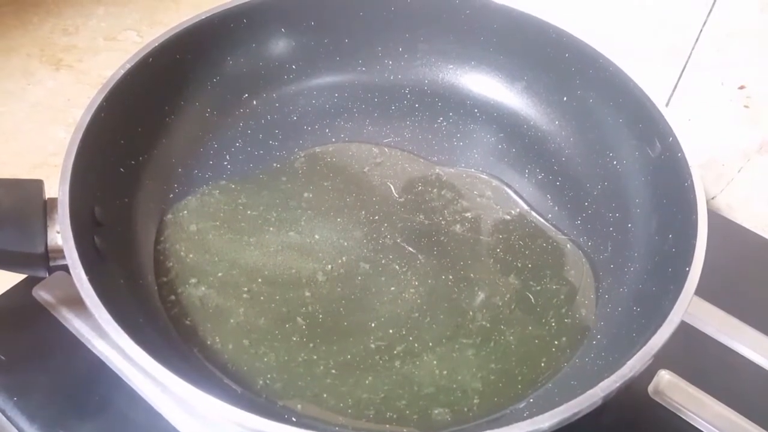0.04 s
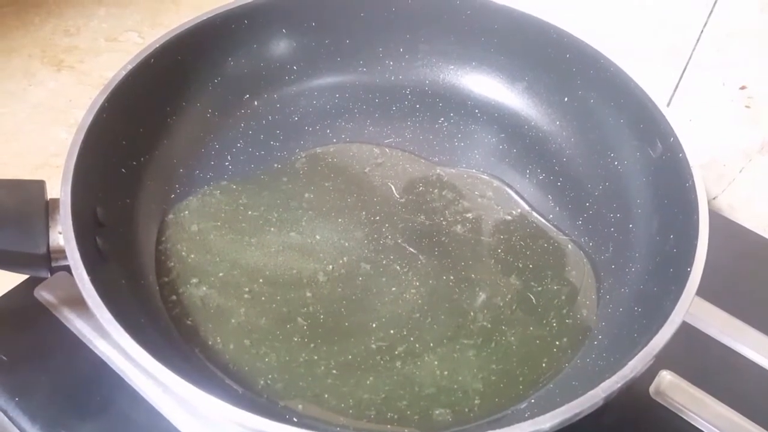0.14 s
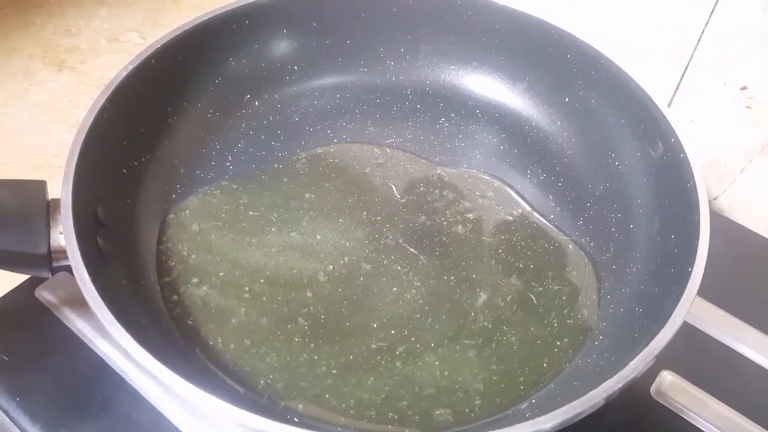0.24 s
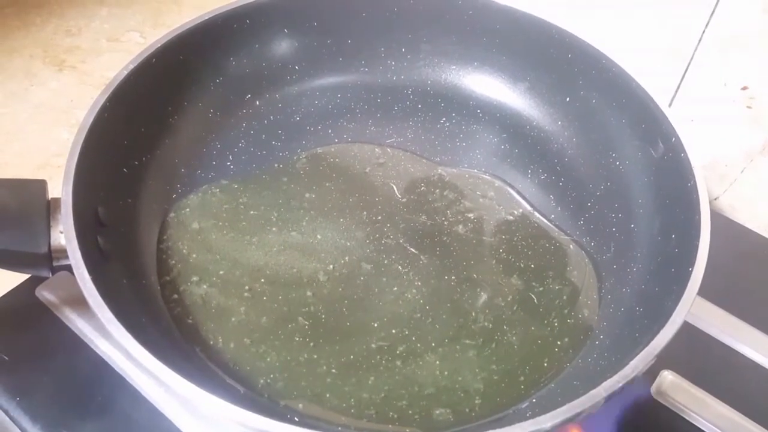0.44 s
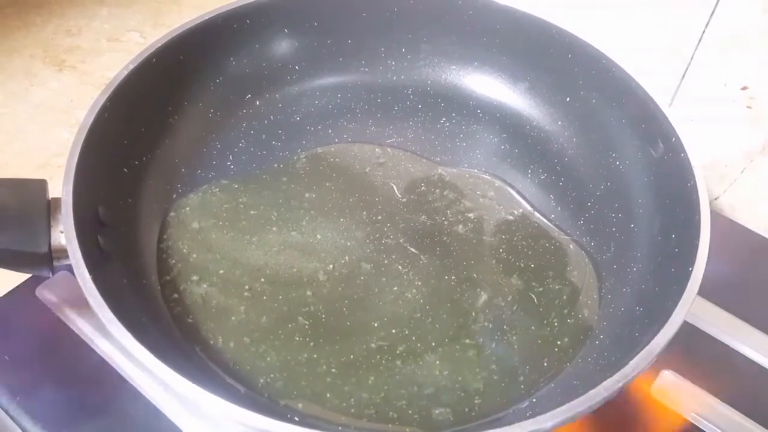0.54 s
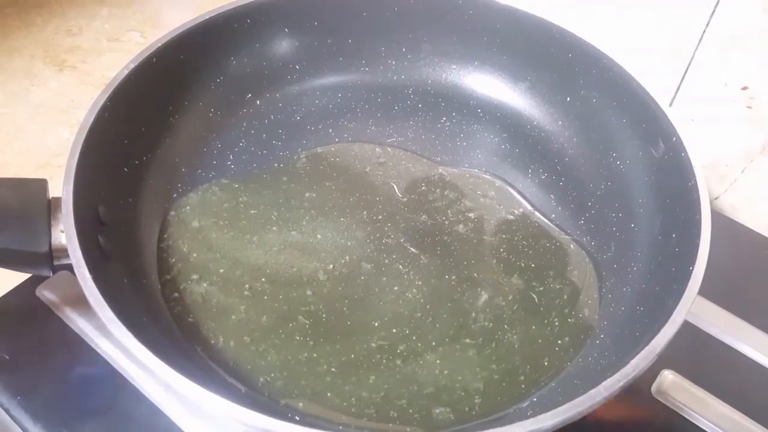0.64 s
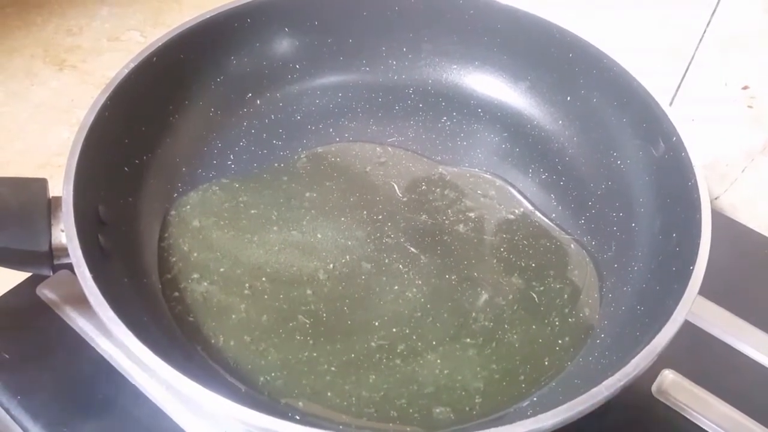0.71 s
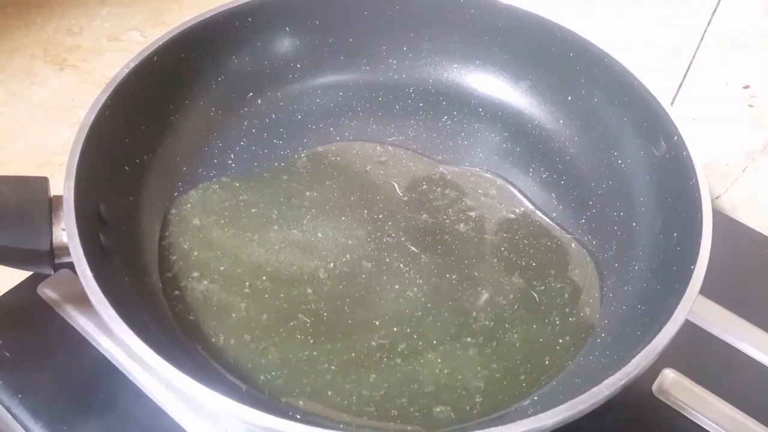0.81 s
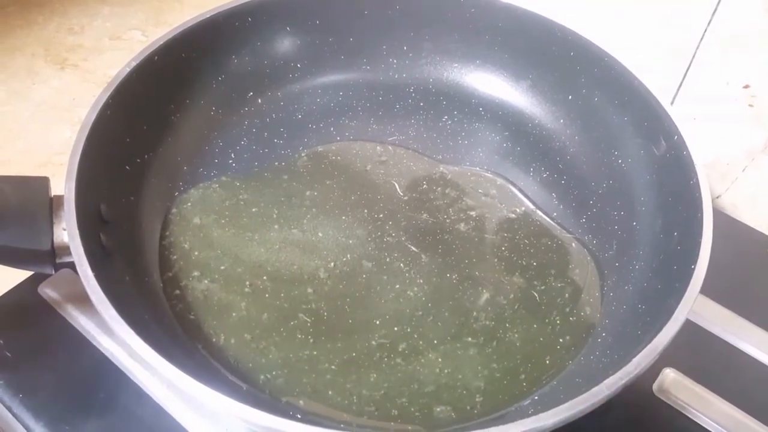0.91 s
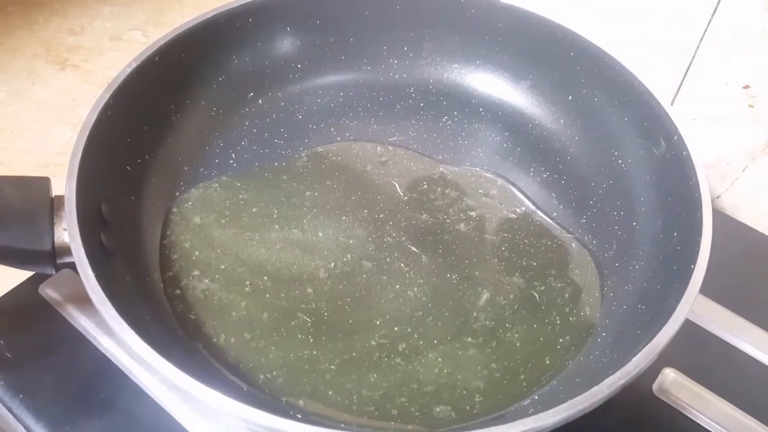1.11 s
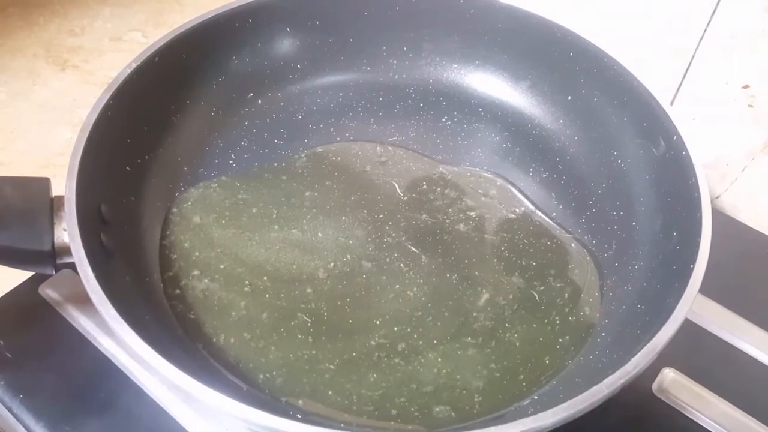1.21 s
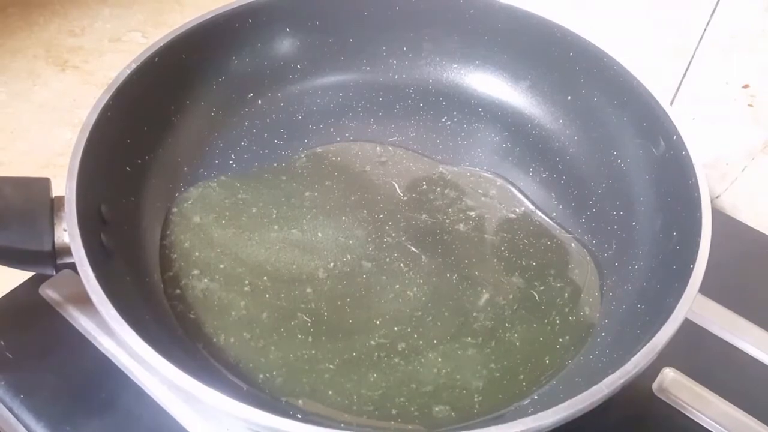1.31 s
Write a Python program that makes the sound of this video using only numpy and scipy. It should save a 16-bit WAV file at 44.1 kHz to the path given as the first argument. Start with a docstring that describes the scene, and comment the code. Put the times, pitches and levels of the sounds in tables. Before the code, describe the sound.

A gas burner lights under a frying pan, heard up close. After a faint hiss and hum, one sharp igniter click rings the stove and pan and echoes off hard kitchen walls. A soft whump follows, leaving a quiet flame.

```python
"""Gas hisses over a low rumble and hum from a burner under a frying pan in a small, hard-walled kitchen.
The igniter snaps once, ringing the stove, the pan and the room and overloading the microphone.
The gas catches with a short flare and a soft, throbbing thump, then settles to a quiet flame."""
import sys
import numpy as np
from scipy import signal
from scipy.fft import rfft, irfft
from scipy.io import wavfile

SR = 44100
rng = np.random.default_rng(int(sys.argv[2]) if len(sys.argv) > 2 else 0)


def unload_wav(signal):
    """Save mono or channel-first audio to the path in sys.argv[1] as 16-bit WAV at rate SR, clipped to [-1, 1]."""
    wavfile.write(
        sys.argv[1],
        SR,
        np.round(np.clip(np.atleast_2d(signal).T, -1, 1) * 32767).astype(np.int16),
    )


N = 59535
T = np.arange(N) / SR
HZ = np.fft.rfftfreq(N, 1 / SR)
SNAP_S, FLARE_S = 0.5202, 0.592  # when the igniter snaps and when the flare peaks

# The tone of the low rumble and the flame's puffs. Each row: frequency in Hz, relative level in dB.
RUMBLE_SPECTRUM = [(20, -28), (38, -15.5), (56, 5), (78, -1.5), (103, 6), (135, -2.5), (200, -19),
                   (400, -85)]


def amp(db):
    """Turns decibels into a gain."""
    return 10 ** (np.asarray(db) / 20)


def value_at(points, hz):
    """Looks up values between a table's rows on a logarithmic frequency scale."""
    row_hz, value = np.transpose(points)
    return np.interp(np.log(hz + 1), np.log(row_hz), value)


def level(points):
    """Gain over time, from rows of seconds and dB."""
    return amp(np.interp(T, *np.transpose(points)))


def noise(gain, likeness):
    """Stereo noise of power 1, shaped by a gain per frequency. Likeness 1 makes both sides equal."""
    mid, side = rfft(rng.standard_normal((2, N)))
    pair = np.sqrt(1 + likeness) * mid + np.sqrt(1 - likeness) * np.array([side, -side])
    shaped = irfft(pair * gain, N)
    return shaped / np.sqrt(np.mean(shaped ** 2) + 1e-20)


def coloured(spectrum, likeness):
    """Noise whose tone follows rows of Hz and dB."""
    return noise(amp(value_at(spectrum, HZ)), likeness)


def narrow_noise(hz, width_hz, likeness):
    """Noise gathered around one pitch."""
    return noise(1 / (1 + (2 * (HZ - hz) / width_hz) ** 2), likeness)


def struck(start_s, rise_s, t60):
    """A quick rise, then a fade of 60 dB every t60 seconds."""
    age = np.maximum(T - start_s, 0)
    return (1 - np.exp(-age / rise_s)) * amp(-60 * age / t60)


def swell(peak_s, rise_s, fall_s):
    """A soft rise to a peak and a soft fall."""
    return np.exp(-((T - peak_s) / np.where(T < peak_s, rise_s, fall_s)) ** 2 / 2)


def gas_jet():
    """The jet hisses and whistles faintly; its tone changes once the flame is lit."""
    # How loud the hiss is. Each row: time in seconds, level in dB.
    hiss_levels = [(0, -43.5), (.19, -45.5), (.25, -43), (.5, -43.5), (.75, -51.5), (.92, -51.5),
                   (1.06, -53.5), (1.18, -49.5), (1.35, -48)]
    # The hiss before and after lighting. Each row: frequency in Hz, relative level in dB.
    unlit_spectrum = [(200, 3.5), (600, 6.5), (1000, 2.5), (1500, 0.5), (2800, 0), (4200, -5.5), (5500, -2),
                      (6100, 6), (6800, -3), (8100, -10.5), (9000, -16.5), (10500, -25), (11700, -17.5),
                      (12600, -41), (15000, -45)]
    lit_spectrum = [(200, -30), (600, 4.5), (1150, 2.5), (1600, 1.5), (2800, -2.5), (4200, -4), (5500, -1),
                    (6150, 7.5), (6800, -3.5), (8100, -10), (9000, -28), (10300, -32), (11700, -13),
                    (12500, -34), (15000, -43)]
    # The jet's whistles. Each row: pitch in Hz, width in Hz, level in dB.
    whistles = [(3250, 46, -65), (6200, 170, -62)]
    likeness = 0.1
    lit = np.clip((T - FLARE_S) / 0.15, 0, 1)
    hiss = np.sqrt(1 - lit) * coloured(unlit_spectrum, likeness)
    hiss += np.sqrt(lit) * coloured(lit_spectrum, likeness)
    whistle = sum(amp(db) * narrow_noise(hz, width, likeness) for hz, width, db in whistles)
    return level(hiss_levels) * hiss + whistle


def low_rumble():
    """A deep background rumble swells and sinks."""
    # How loud the rumble is. Each row: time in seconds, level in dB.
    rumble_levels = [(0, -33.5), (.17, -40.5), (.245, -26), (.315, -39), (.43, -26), (.49, -30.5),
                     (.53, -45), (.74, -40), (.8, -40), (1.05, -42.5), (1.35, -39)]
    return level(rumble_levels) * coloured(RUMBLE_SPECTRUM, likeness=1)


def burner_rush():
    """The burner's rush sounds hollow because the air under the pan resonates."""
    # How loud the rush is. Each row: time in seconds, level in dB.
    rush_levels = [(0, -43.5), (.3, -42.5), (.43, -36), (.5, -37), (.69, -33.5), (.77, -48.5), (.87, -48),
                   (1.0, -44), (1.15, -41.5), (1.35, -44.5)]
    # The tone of the rush. Each row: frequency in Hz, relative level in dB.
    rush_spectrum = [(60, -22), (120, -1), (160, 3), (215, -2.5), (290, -0.5), (340, -6.5), (400, -8),
                     (480, -10), (700, -24.5), (1050, -18), (2000, -71)]
    # Air resonances. Each row: pitch in Hz, width in Hz, unlit and lit levels in dB against the rush.
    hollows = [(104.4, 26, -2, -4.5), (178.6, 10, -11, -5.5), (205.6, 7.7, -20, -6),
               (280.9, 17, -11.5, -8.5), (389.8, 51, -6.5, -16.5)]
    likeness = 0.873
    lit = np.clip((T - FLARE_S) / 0.22, 0, 1)
    rush = coloured(rush_spectrum, likeness)
    for hz, width, unlit_db, lit_db in hollows:
        rush += amp(unlit_db + lit * (lit_db - unlit_db)) * narrow_noise(hz, width, likeness)
    return level(rush_levels) * rush


def burner_hum():
    """The burner hums one wavering note, a little higher once it is lit."""
    # The path of the hum. Each row: time in seconds, pitch in Hz, level in dB.
    hum_path = [(0, 284, -59.5), (.3, 278, -49), (.45, 281, -32.5), (.52, 283, -35), (.62, 296, -43),
                (.78, 298, -40.5), (.88, 298, -61), (1.1, 300, -51), (1.33, 302, -39.5)]
    times, hz, db = np.transpose(hum_path)
    waver, drift = 0.45 * noise(1 / (1 + (HZ / 15) ** 4), likeness=0)  # mostly slower than 15 Hz
    phase = 2 * np.pi * np.cumsum(np.interp(T, times, hz)) / SR
    return amp(np.interp(T, times, db)) * (1 + waver) * np.sin(phase + drift)


def igniter():
    """A sprung hammer ticks, cracks and rebounds; the stove top gives under it with a low knock."""
    # The hammer's blow and rebounds. Each row: delay after the snap in seconds, level in dB.
    blows = [(0, -10), (.0038, -13), (.0066, -14.5), (.0106, -11)]
    # The tones of the crack and the sharp tick. Each row: frequency in Hz, relative level in dB.
    crack_spectrum = [(40, -35), (150, -22), (400, -41), (1200, -4), (2100, 3.5), (3200, -13), (4700, 6.5),
                      (6200, 4.5), (7100, 8.5), (8000, 2), (9000, -6.5), (10200, -12.5), (12800, -29),
                      (14300, -16), (15200, -48)]
    tick_spectrum = [(300, -48), (2000, 6.5), (4000, 1), (5600, 4.5), (7200, 9), (8500, -15),
                     (10000, -13.5), (13000, -20), (14500, -40)]
    tick = amp(-4) * struck(SNAP_S + 0.0002, rise_s=0.0001, t60=0.01)
    tick = tick * coloured(tick_spectrum, likeness=0.5)
    crack = np.zeros((2, N))
    for delay, db in blows:
        burst = amp(db) * struck(SNAP_S + delay, rise_s=0.0002, t60=0.036)
        crack += burst * coloured(crack_spectrum, likeness=0.037)
    knock_hz, knock_rise_s = 250, 0.0107
    age = np.maximum(T - SNAP_S, 0)
    knock_level = amp(-17.5) * age / knock_rise_s * np.exp(1 - age / knock_rise_s)
    return tick + crack + knock_level * np.sin(2 * np.pi * knock_hz * age)


def ringing_metal():
    """The snap sets the stove body, the pan and its support ringing."""
    # The metal's notes. Each row: pitch in Hz, level in dB, seconds to fade by 60 dB.
    stove_notes = [(226.5, -23.5, 0.47), (265.3, -26, 0.31), (350.8, -27, 0.68), (380.3, -31, 0.65),
                   (503, -37, 0.53), (574.4, -31.5, 0.53), (609, -28.5, 0.38), (739, -35, 0.72),
                   (810, -54, 0.47), (866, -31, 0.45), (981, -32.5, 0.32), (998, -30, .38),
                   (1082, -29.5, 0.32), (1097, -27.5, 0.23)]
    pan_notes = [(1834, -41, 0.4), (1960, -31, 0.34), (2013, -18, 0.12), (2250, -28, 0.28),
                 (2670, -29.5, 0.33), (2733, -25.5, 0.27), (3877, -36, .3), (4750, -29.5, 0.45),
                 (5020, -31, 0.15), (5360, -28, 0.29)]
    age = np.maximum(T - SNAP_S, 0)
    ring = np.zeros((2, N))
    for hz, db, t60 in stove_notes + pan_notes:
        offset, apart = rng.uniform(-0.94, 1, 2)
        spread = min(hz / 1800, 0.8) * np.array([[1], [-1]])  # low notes differ less between the ears
        phase = np.pi * (offset + apart * spread)
        ring += amp(db) * struck(SNAP_S, 0.005, t60) * np.sin(2 * np.pi * hz * age + phase)
    return ring


def kitchen_echoes():
    """Hard walls return the snap as dense, ringing echoes; the treble dies first."""
    # The tone of the echoes. Each row: frequency in Hz, relative level in dB.
    echo_spectrum = [(40, -40), (130, -21), (300, 0), (460, -8.5), (690, -4.5), (930, 0.5), (1500, -4),
                     (2300, 0.5), (3500, -3), (5000, 1.5), (6200, -4.5), (7100, -1.5), (7700, -5.5),
                     (8400, -9), (9600, -26.5), (12500, -10.5), (14000, -26), (15200, -44)]
    # How long they last. Each row: frequency in Hz, seconds to fade by 60 dB.
    fade_times = [(200, 1), (1000, 0.56), (4000, 0.45), (7500, 0.45), (11000, 0.27), (15000, 0.18)]
    grid_hz = np.arange(0, SR / 2, 22)  # crowded small resonances colour the echoes
    ripple_db = np.interp(HZ, grid_hz, rng.uniform(-3.4, 3, len(grid_hz)))
    wash = noise(amp(value_at(echo_spectrum, HZ) + ripple_db), likeness=0.057)
    hz, times, bands = signal.stft(wash, SR, nperseg=256)
    fade = amp(-60 * np.maximum(times - SNAP_S, 0) / value_at(fade_times, hz)[:, None])
    tail = signal.istft(bands * fade, SR, nperseg=256)[1][:, :N]
    onset = np.clip((T - SNAP_S) / 0.004, 0, 1)
    return amp(-17) * onset * tail


def catching_flame():
    """The flame flares round the burner, and the air under the pan throbs with it."""
    # The tone of the flare. Each row: frequency in Hz, relative level in dB.
    flare_spectrum = [(30, -8), (60, 0), (130, 7), (210, 5.5), (350, 3.5), (470, -4), (1000, -5),
                      (2500, -7), (5200, -11), (7600, -13), (9500, -26), (13000, -37), (15000, -38)]
    # The throbs. Each row: peak time in seconds, pitch in Hz, level in dB, rise and fall in seconds.
    throbs = [(.607, 93, -13, .014, .011), (.674, 98, -22, .024, .058)]
    flare = coloured(flare_spectrum, likeness=1 / (1 + (HZ / 600) ** 2))  # central bass, wide treble
    flame = amp(-22.5) * swell(FLARE_S, rise_s=0.02, fall_s=0.0081) * flare
    for peak_s, hz, db, rise_s, fall_s in throbs:
        wobble = 0.4 * noise(1 / (1 + (HZ / 40) ** 4), likeness=1)[0]
        phase = 2 * np.pi * hz * (T - peak_s) + wobble
        overtone = amp(-15.5) * np.cos(2 * phase + 2 * wobble)
        puff = amp(-7.5) * coloured(RUMBLE_SPECTRUM, likeness=0.99)
        flame += amp(db) * swell(peak_s, rise_s, fall_s) * (np.cos(phase) + overtone + puff)
    return flame


def scene():
    """Mixes the sounds. The snap's treble leans to the right; the rest is balanced."""
    burner = gas_jet() + low_rumble() + burner_rush() + burner_hum()
    snap = igniter() + ringing_metal() + kitchen_echoes()
    lean_db = np.interp(HZ, [6000, 9000], [0, 3.75])
    snap = irfft(rfft(snap) * amp([-lean_db, lean_db]), N)
    return burner + snap + catching_flame()


def record(dry):
    """The microphone overloads softly on the snap, then the highest treble is cut away."""
    clipped = dry / (1 + dry ** 4) ** (1 / 4)
    low_pass = signal.firwin(255, cutoff=14500, window=("kaiser", 9), fs=SR)
    return signal.oaconvolve(clipped, low_pass[None], "same")


dry = scene()
out = record(dry)
unload_wav(out)
```